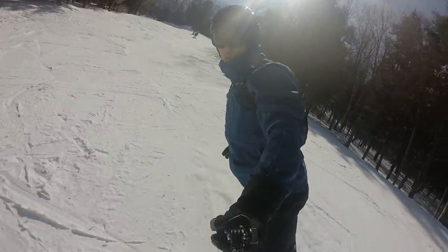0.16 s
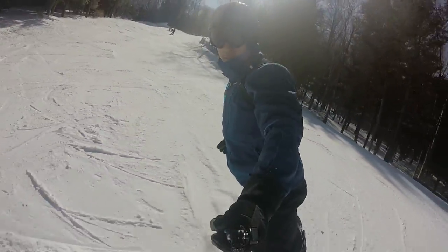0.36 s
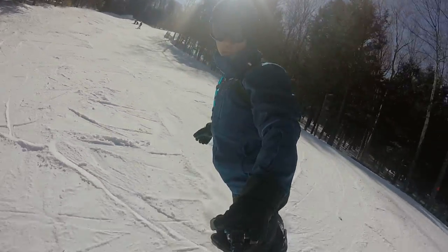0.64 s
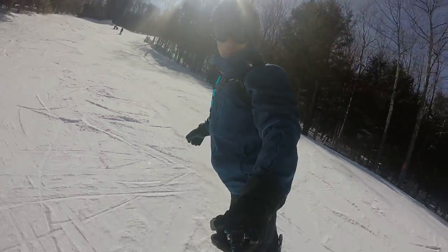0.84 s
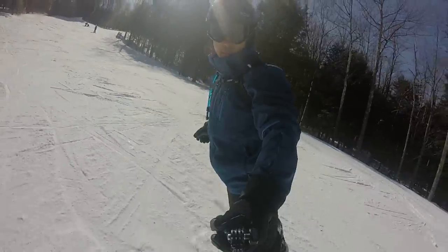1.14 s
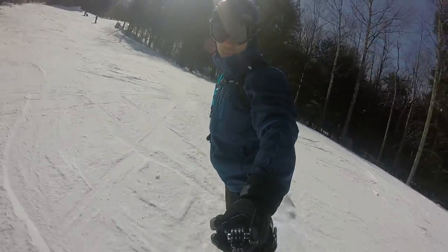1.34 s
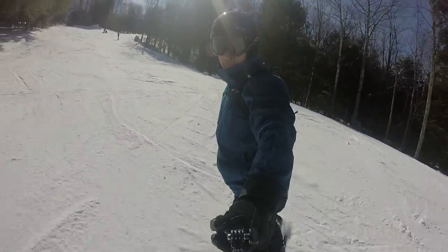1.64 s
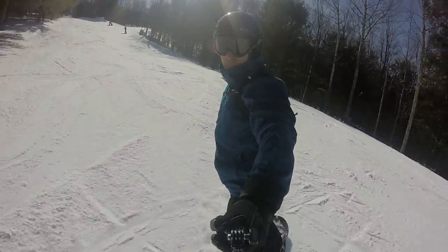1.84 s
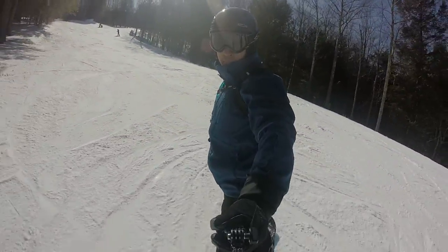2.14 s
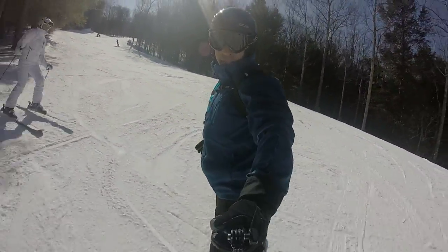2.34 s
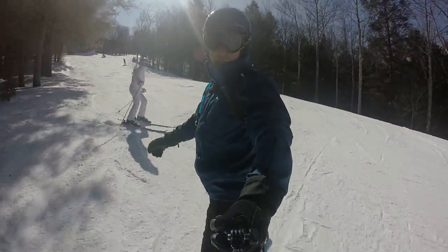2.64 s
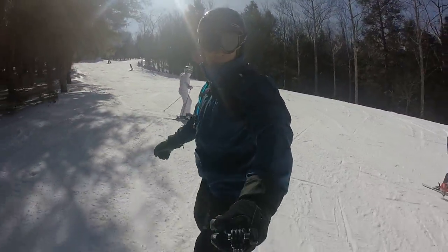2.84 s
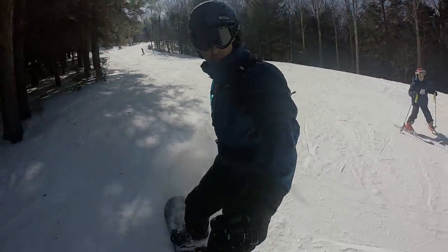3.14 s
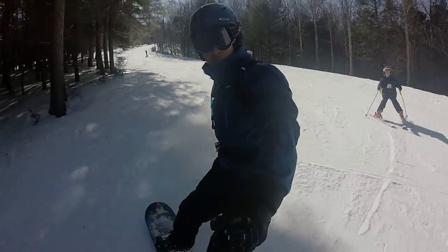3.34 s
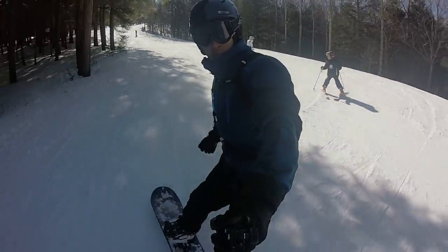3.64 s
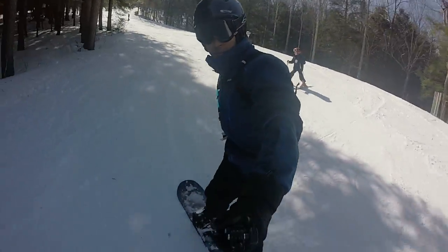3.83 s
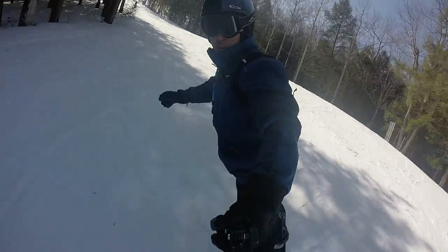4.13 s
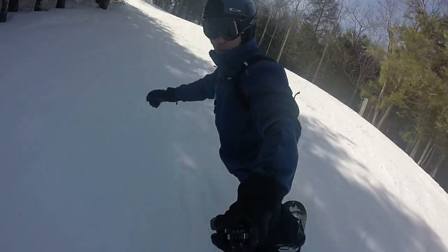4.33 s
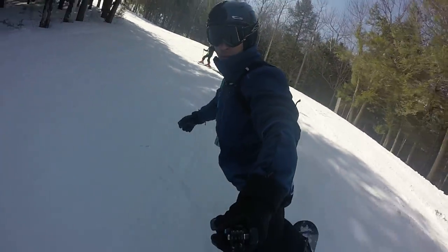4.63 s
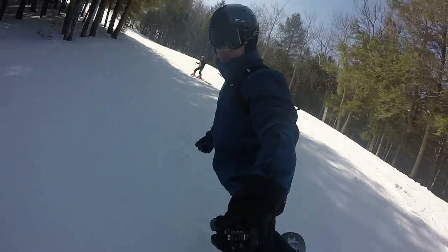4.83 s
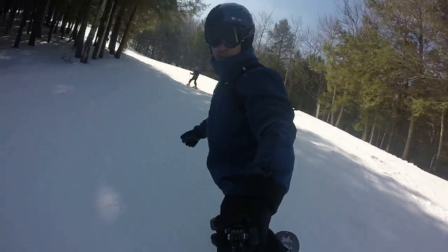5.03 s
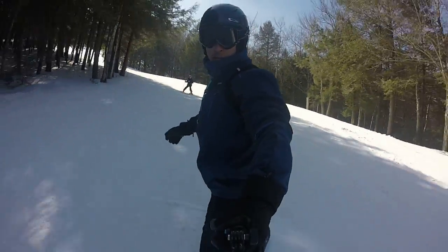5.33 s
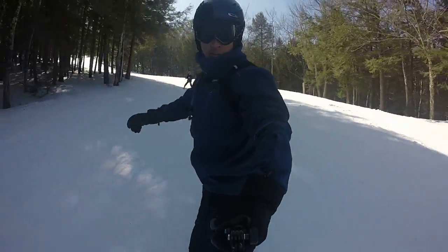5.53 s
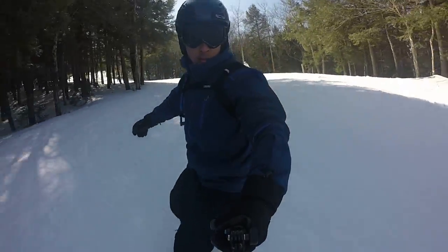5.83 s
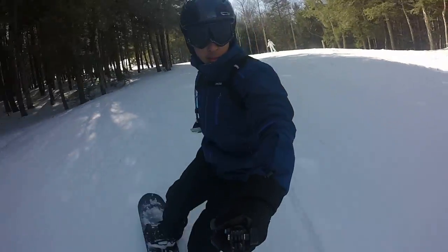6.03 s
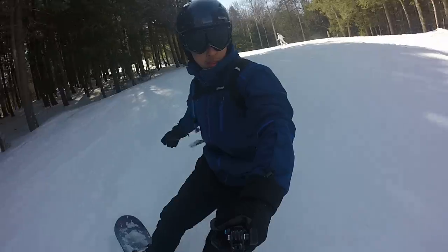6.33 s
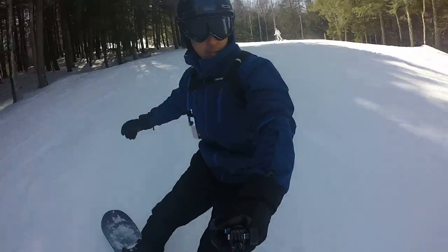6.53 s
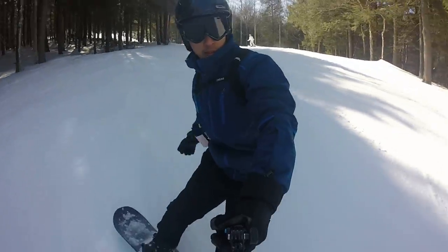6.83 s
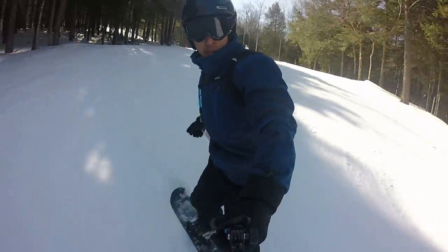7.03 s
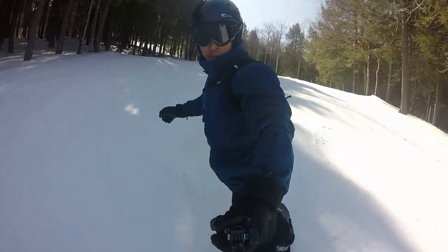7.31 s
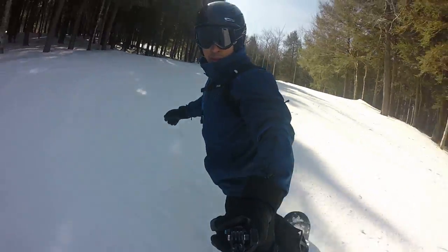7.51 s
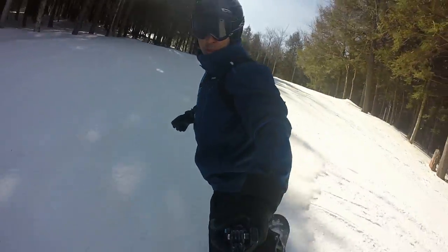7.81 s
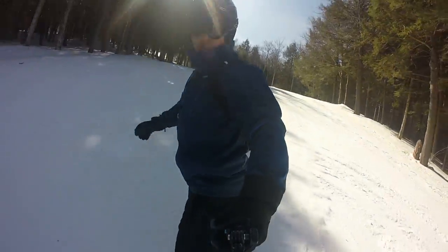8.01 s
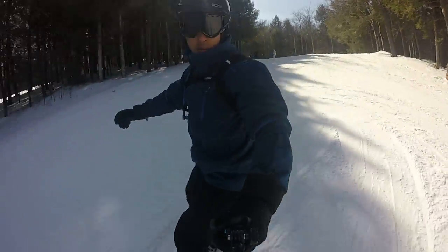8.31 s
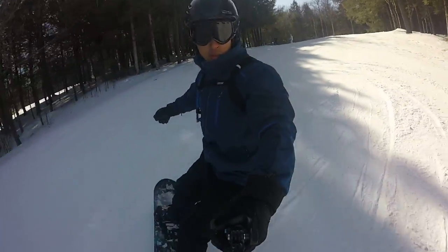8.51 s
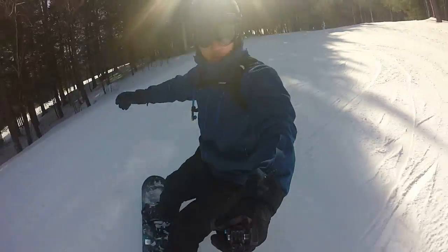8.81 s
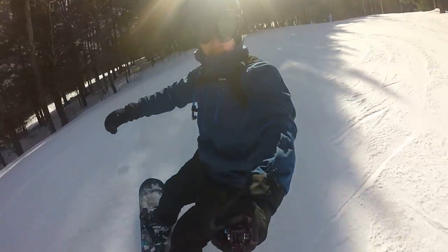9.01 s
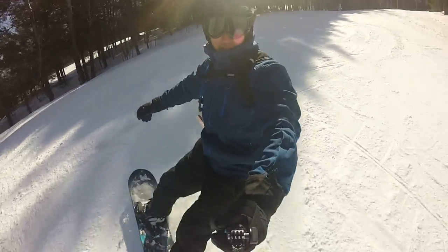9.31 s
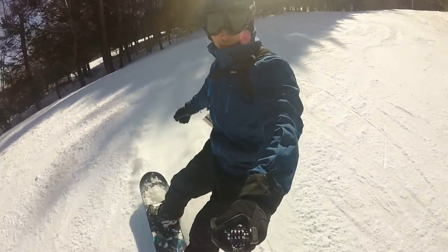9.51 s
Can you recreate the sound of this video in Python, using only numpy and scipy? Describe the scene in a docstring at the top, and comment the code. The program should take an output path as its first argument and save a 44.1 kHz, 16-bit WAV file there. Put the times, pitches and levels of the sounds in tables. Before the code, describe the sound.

A snowboard hisses and scrapes through linked turns on packed snow, harsher carves building midway, with low wind buffeting and a sharp mount click near the end.

```python
"""On a packed slope a snowboarder links turns, a camera on a pole carrying the microphone (mono, both sides).
Short edge bites, scuffs over ridges and small mount ticks come first, over random grain breaks and a low glide.
From 4 s carves bite harder, and the loudest comes near 6 s; the edge crushes grains and chatters through
resonances that differ for toe and heel. More carves and bright plumes follow, with a sharp mount click
near 9.4 s. Throughout, wind noise in gusts and flurries buffets the microphone."""
import sys
import numpy as np
from scipy import signal
from scipy.fft import rfft, irfft
from scipy.io import wavfile
from scipy.ndimage import uniform_filter1d

SR = 44100
rng = np.random.default_rng(int(sys.argv[2]) if len(sys.argv) > 2 else 0)


def generate_wav(sig):
    """Save sig (samples, or channels by samples) to the path in sys.argv[1] as 16-bit PCM at SR."""
    pcm = np.round(np.clip(np.atleast_2d(sig).T, -1, 1) * 32767).astype(np.int16)
    wavfile.write(sys.argv[1], SR, pcm)


N = 426006  # samples
T = np.arange(N) / SR  # s
FREQ = np.maximum(np.fft.rfftfreq(N, 1 / SR), 1)  # Hz


def undb(db):
    """Decibels to gain."""
    return 10 ** (np.asarray(db) / 20)


def unit(x):
    """Scale to rms 1."""
    return x / np.sqrt(np.mean(x ** 2))


def even(x):
    """Hold the rms of a noise near 1 from moment to moment."""
    power = uniform_filter1d(x ** 2, size=SR // 6)
    return x / np.sqrt(power)


def curves(table):
    """Each column of a table, joined by straight lines in time."""
    s, *columns = np.transpose(table)
    return [np.interp(T, s, column) for column in columns]


def swells(table):
    """Power of bell-shaped swells."""
    return sum(undb(db) ** 2 * np.exp(-((T - s) / half) ** 2) for s, db, half in table)


def shape(x, gain):
    """Filter by a gain for each frequency."""
    return irfft(rfft(x) * gain, N)


def walk(hz):
    """Smooth random movement of rms 1, up to about hz times a second."""
    return unit(shape(rng.standard_normal(N), 1 / (1 + (FREQ / hz) ** 4)))


def board(heel, edge, body, spray):
    """The scrape: a low board body, the bite of the edge and a fine spray, all shaken by the same chatter."""
    body_band, bite_band, spray_band = (195, 1900), (1900, 7500), (7500, 16000)  # Hz
    grip = chatter(bump_db=1.15, judder_db=0.81, bump_hz=20.2, judder_hz=169)
    coarse = grip * crunch(grains_per_s=1200, scatter_db=3.5, smooth_db=6.0)
    fine = grip * crunch(grains_per_s=5000, scatter_db=2.5, smooth_db=-0.5)
    bite_force = unit(fine + 0.53 * coarse)
    low_body = body * undb(-0.86) * radiate(coarse, heel, body_band)
    bite = edge * undb(-2.0) * radiate(bite_force, heel, bite_band)
    fine_spray = spray * radiate(fine, heel, spray_band)
    return low_body + bite + fine_spray


# The edge pressed into packed snow. Each row: edge set in seconds, edge let go in seconds,
# drive level when set in dB, drive level when let go in dB, bite in seconds, release in seconds,
# board body over that level in dB.
CARVE_LOADS = [(0.0, 0.04, -36, -37, .1, .08, -7), (0.288, 0.353, -41.5, -42.5, 0.088, 0.52, -5.5),
               (0.593, 0.703, -40.5, -37.5, 0.1, 0.041, -11), (1.787, 1.877, -40.5, -40, 0.079, 0.16, -6),
               (3.316, 3.437, -43, -42, 0.16, 0.11, -3.5), (3.555, 3.61, -36, -45.5, 0.074, 0.066, -3),
               (3.687, 3.804, -57.5, -47.5, 0.16, 0.13, -2.5), (4.073, 4.12, -47, -44.5, 0.13, 0.12, -0.5),
               (4.284, 4.476, -30.5, -31.5, 0.1, 0.053, -10), (4.57, 4.815, -30.5, -30, 0.15, 0.22, -10.5),
               (4.93, 4.961, -34.5, -35.5, .12, .11, -12.5), (5.96, 5.99, -49.5, -42, 0.14, .05, 4),
               (6.049, 6.137, -23.5, -23, 0.085, 0.022, -8), (6.163, 6.246, -32.5, -35, .03, 0.15, -9),
               (6.38, 6.465, -39, -42, 0.3, .15, -9), (6.58, 6.705, -30, -33, 0.38, 0.29, -7.5),
               (6.788, 6.909, -32.5, -38, 0.33, 0.072, -2), (7.296, 7.355, -47.5, -44, 0.03, 0.049, -4.5),
               (7.541, 7.645, -30, -29, 0.076, 0.33, -9), (7.73, 7.87, -41, -32, 0.24, 0.14, -9),
               (7.99, 7.995, -39.5, -40.5, .1, 0.14, -4.5), (8.533, 8.614, -40.5, -36.5, 0.038, .06, -7.5),
               (8.674, 8.718, -36, -34.5, 0.13, 0.24, -8), (8.881, 8.981, -33, -35, .15, 0.1, -7),
               (9.098, 9.594, -31, -32, 0.23, 0.14, -6.5)]
RAMP_DB = 20  # rise over one bite time and fall over one release time, for edge and body
SPRAY_RAMP = 1.2  # spray starts later and stops sooner: its ramps are this much steeper


def carving():
    """Power of edge, body and spray: in each carve the edge bites, holds while the load shifts, and lets go."""
    edge, body, spray = np.zeros((3, N))
    for start, end, start_db, end_db, bite, release, body_db in CARVE_LOADS:
        before = np.maximum(start - T, 0) / bite
        after = np.maximum(T - end, 0) / release
        ramp_db = RAMP_DB * (before + after)
        near = ramp_db < 60  # skip the faint tails
        ramp_db = ramp_db[near]
        load_db = np.interp(T[near], [start, end], [start_db, end_db])
        edge[near] += undb(load_db - ramp_db) ** 2
        body[near] += undb(load_db + body_db - ramp_db) ** 2
        spray[near] += undb(load_db - SPRAY_RAMP * ramp_db) ** 2
    return edge, body, spray


# The base running flat between turns. Each row: time in seconds, drive level in dB,
# fine spray over that level in dB.
FLAT_GLIDE = [(0, -52, -15), (1.1, -51.5, -9), (1.6, -54.5, -7), (2.05, -50, -13.5), (2.85, -56, -9),
              (3.15, -54, -8), (3.92, -60, -1), (5.1, -48.5, -14.5), (5.36, -58.5, -8), (5.66, -55.5, -5),
              (5.85, -56.5, -25), (7.1, -55.5, -4.5), (8.15, -57, -14), (8.32, -57, -7), (9.66, -81, -8)]
GLIDE_BODY_DB = -4  # board body over the glide's level
CARVE_SPRAY_DB, HEEL_SPRAY_DB = -16.5, 5.5  # spray over a carve's level, and what full heel adds


def pressure(heel):
    """Strength of edge, body and spray: glide and carves add up, and the heel edge sprays more."""
    glide_db, glide_spray_db = curves(FLAT_GLIDE)
    edge, body, spray = carving()
    carve_spray = spray * undb(CARVE_SPRAY_DB + HEEL_SPRAY_DB * heel) ** 2
    return np.sqrt([edge + undb(glide_db) ** 2,
                    body + undb(glide_db + GLIDE_BODY_DB) ** 2,
                    carve_spray + undb(glide_db + glide_spray_db) ** 2])


def chatter(bump_db, judder_db, bump_hz, judder_hz):
    """The edge grips and lets go: slow bumps under a fast, uneven judder."""
    return unit(undb(bump_db * walk(bump_hz) + judder_db * walk(judder_hz)))


def crunch(grains_per_s, scatter_db, smooth_db):
    """Snow grains breaking at random, a few large among many small, over the even hiss of the base."""
    breaks = rng.random(N) < grains_per_s / SR
    size = undb(scatter_db * np.minimum(rng.exponential(size=N), 5))
    grains = unit(breaks * size * rng.choice([-1, 1], N))
    return unit(grains + undb(smooth_db) * rng.standard_normal(N))


def resonances(modes):
    """Gain of overlapping resonances whose powers add."""
    return np.sqrt(sum((undb(db) / (1 + ((FREQ - hz) / width) ** 2)) ** 2 for hz, width, db in modes))


# Resonances of the scrape at the camera, on the toe edge and on the heel edge.
# Each row: centre in Hz, distance to half amplitude in Hz, relative level in dB.
TOE_RESONANCES = [(304, 124, -5), (440, 350, -11), (787, 290, -11.5), (1274, 46, -7.5), (1383, 56, -6),
                  (1634, 42, -7.5), (2305, 280, -0.5), (2730, 100, -10.5), (2548, 60, 2), (2944, 210, -1),
                  (3368, 112, -1), (3690, 220, -7), (4420, 400, -6.5), (4850, 180, -6.5), (5210, 110, -9.5),
                  (6110, 380, -9.5), (6905, 390, -11.5), (9340, 620, -17.5), (10410, 280, -19),
                  (11830, 750, -25), (14470, 640, -32.5)]
HEEL_RESONANCES = [(280, 62, -12), (493, 310, -16), (745, 440, -6.5), (1256, 113, 2), (1462, 51, 0.5),
                   (1696, 42, -3), (2240, 190, -3), (2530, 63, 0), (2656, 14, 5.5), (2884, 290, -0.5),
                   (3336, 170, 0.5), (3780, 200, -8), (4620, 390, -4), (4980, 280, 0), (5440, 160, -1.5),
                   (6130, 390, -0.5), (6800, 530, -7.5), (8840, 590, -9.5), (10320, 490, -15.5),
                   (11970, 670, -20.5), (14420, 870, -27)]


def radiate(force, heel, band):
    """One band of the scrape, toe and heel colours each at rms 1 and blended with the stance."""
    low_hz, high_hz = band
    window = 1 / np.sqrt((1 + (low_hz / FREQ) ** 12) * (1 + (FREQ / high_hz) ** 24))
    toe_side = unit(shape(force, window * resonances(TOE_RESONANCES)))
    heel_side = unit(shape(force, window * resonances(HEEL_RESONANCES)))
    return (1 - heel) * toe_side + heel * heel_side


# Plumes of loose snow off the edge. Each row: centre in seconds, level in dB,
# time from the centre to 1/e of the power in seconds.
SNOW_PLUMES = [(3.32, -49.5, 0.23), (6.23, -46, 0.095), (6.7, -35.5, 0.13), (9.46, -33.5, 0.13)]


def plumes(heel):
    """Loose snow thrown off the edge patters down as a bright hiss."""
    patter = crunch(grains_per_s=6500, scatter_db=3.5, smooth_db=-1)
    return np.sqrt(swells(SNOW_PLUMES)) * radiate(patter, heel, (6060, 16000))  # Hz


# Short scuffs over ridges. Each row: start in seconds, burst level before its envelope in dB,
# decay length in seconds, lowpass corner in Hz.
RIDGE_SCUFFS = [(0.882, -44, 0.0084, 1800), (0.973, -46, 0.048, 3000), (1.03, -46.5, 0.043, 3000),
                (1.381, -46, 0.03, 3800), (1.671, -47.5, 0.013, 3500), (1.745, -38.5, 0.0089, 3600),
                (1.803, -33.5, 0.016, 5500), (2.01, -39.5, 0.0039, 4500), (2.243, -45.5, 0.019, 3500),
                (3.596, -36, 0.019, 6500), (3.813, -42, 0.015, 5500), (4.039, -44.5, 0.088, 1750),
                (5.459, -44.5, 0.0072, 2000), (5.483, -47, 0.036, 1400), (6.167, -29, 0.0073, 4530),
                (6.21, -29, .012, 8500), (6.335, -33, 0.018, 3500), (6.363, -27, 0.014, 7340),
                (6.977, -42, 0.0092, 3000), (7.285, -43.5, 0.025, 3000)]


def scuffs(heel):
    """The edge catches a ridge and breaks a burst of coarse grains; soft ridges sound duller."""
    rasp = radiate(crunch(grains_per_s=2800, scatter_db=-4.0, smooth_db=0.5), heel, (200, 9000))
    out, t = np.zeros(N), T[:SR // 8]
    for s, db, length, bright_hz in RIDGE_SCUFFS:
        start = int(s * SR)
        span = slice(start, start + len(t))
        lowpass = signal.butter(2, bright_hz, fs=SR, output="sos")
        burst = unit(signal.sosfilt(lowpass, rasp[span]))
        envelope = (1 - np.exp(-12 * t / length)) * np.exp(-(t / length) ** 2)
        out[span] += undb(db) * burst * envelope
    return out


def crumbs(heel, edge):
    """Loose lumps of snow crumble under the base, more loudly as the edge presses."""
    lumps = (rng.random(N) < 45 / SR) * rng.uniform(0, 1, N)  # 45 a second
    decay = np.exp(-1 / (0.0065 * SR))  # 6.5 ms
    crumbling = signal.lfilter([1], [1, -decay], lumps)
    # on a hard-set edge the scrape outgrows them
    level = np.minimum(edge * undb(-9.5), undb(-51))
    return level * radiate(crumbling * rng.standard_normal(N), heel, (400, 4200))


# Modes of the pole mount. Each row: pitch in Hz, relative level in dB, time to fall 60 dB in seconds.
MOUNT_MODES = [(930, -15, 0.014), (1470, -5.5, 0.02), (2650, -11, 0.017), (2860, -3, 0.028),
               (3230, -7, 0.014), (3770, -9.5, 0.014), (4880, -5, 0.015), (5130, -8, 0.0092),
               (6330, -19, .007)]
# Small ticks and sharp clicks of the mount. Each row: start in seconds, peak level in dB,
# centre of the ring in Hz.
MOUNT_TICKS = [(1.2367, -43, 2800), (2.68, -43, 1000), (2.811, -41, 2870), (2.982, -41, 3400),
               (3.001, -43, 2620), (3.088, -36, 3300), (3.165, -34, 3270), (5.4607, -30, 1300),
               (5.4644, -29, 2500), (5.473, -33, 3330), (5.5694, -30, 2900), (5.572, -42, 2940),
               (8.347, -45, 2800), (9.3876, -8, 5160), (9.389, -15.5, 1450)]


def ticks():
    """The plastic mount slips with a crack and rings briefly; each tick rings around its own centre pitch."""
    out, t = np.zeros(N), T[:SR // 10]
    modes = sum(undb(db - 60 * t / t60) * np.sin(2 * np.pi * hz * t) for hz, db, t60 in MOUNT_MODES)
    for s, db, centre_hz in MOUNT_TICKS:
        crack = undb(-6) * np.exp(-t / 0.0023) * rng.standard_normal(len(t))
        contact = signal.butter(2, [centre_hz / 1.6, centre_hz * 1.6], "band", fs=SR, output="sos")
        ring = signal.sosfilt(contact, modes + crack)
        start = int(s * SR)
        out[start:start + len(t)] += undb(db) * ring / np.abs(ring).max()
    return out


# Gusts at the microphone. Each row: centre in seconds, level in dB,
# time from the centre to 1/e of the power in seconds.
WIND_GUSTS = [(.05, -42, .08), (.35, -32.5, 0.04), (1.7, -40.5, 0.35), (3.1, -42, 0.16), (3.7, -43.5, 0.21),
              (4.25, -39, 0.24), (5.98, -39, 0.19), (6.45, -43, 0.19), (6.88, -38.5, 0.066),
              (7.22, -38, 0.25), (8.4, -38.5, 0.084), (8.6, -31, 0.036), (8.77, -40, 0.017),
              (8.93, -38, .04), (9.14, -36, .05), (9.6, -38.5, 0.3)]
# Spectrum of the eddies at the microphone port. Each row: pitch in Hz, relative level in dB.
EDDY_SPECTRUM = [(10, -7), (20, -1), (32, -2), (48, -10.5), (72, -11.5), (100, -22), (135, -26),
                 (200, -31.5), (400, -42), (1200, -60)]
BREEZE_DB = -46.5  # steady airflow of the ride on the microphone
FLURRY_DB, FLURRY_HZ = 1.73, 11  # depth and pace of the flurries of small eddies
# eddies above this pitch: level over the breeze, and exponent by which they follow the gusts
SMALL_EDDY_HZ, SMALL_EDDY_DB, SMALL_EDDY_FOLLOW = 55, -4.5, 0.17


def wind():
    """Eddies roll over the microphone port; large ones swell with the gusts, small ones come in flurries."""
    gust = np.sqrt(1 + swells(WIND_GUSTS) / undb(BREEZE_DB) ** 2)
    hz, db = np.transpose(EDDY_SPECTRUM)
    spectrum = undb(np.interp(np.log(FREQ), np.log(hz), db))
    eddies = shape(rng.standard_normal(N), spectrum)
    large = shape(eddies, 1 / (1 + (FREQ / SMALL_EDDY_HZ) ** 4))
    flurries = unit(undb(FLURRY_DB * walk(FLURRY_HZ)))
    small = even(eddies - large) * flurries
    small_level = undb(SMALL_EDDY_DB) * gust ** SMALL_EDDY_FOLLOW
    return undb(BREEZE_DB) * (gust * even(large) + small_level * small)


# The rider's stance. Each row: time in seconds, weight on the heel edge from 0 to 1.
HEEL_WEIGHT = [(0, 0.18), (2.7, 0.3), (3.1, 0.24), (3.8, 0.67), (4.25, 0.2), (5.6, 0.25), (6.0, 0.59),
               (6.25, 0.91), (6.95, 0.81), (7.4, 0.25), (8.05, 0.37), (8.55, 0.78), (9.2, 0.82),
               (9.66, 0.73)]


def scene():
    """Board, mount and wind in the open, with no echo."""
    heel = np.clip(curves(HEEL_WEIGHT)[0], 0, 1)
    edge, body, spray = pressure(heel)
    snow = board(heel, edge, body, spray) + plumes(heel) + scuffs(heel) + crumbs(heel, edge)
    mono = snow + ticks() + wind()
    return np.array([mono, mono])


def record(dry):
    """The camera cuts the top with a steep lowpass at 15.3 kHz."""
    lowpass = signal.ellip(12, .1, 80, 15300, fs=SR, output="sos")
    return signal.sosfilt(lowpass, dry)


dry = scene()
out = record(dry)
generate_wav(out)
```